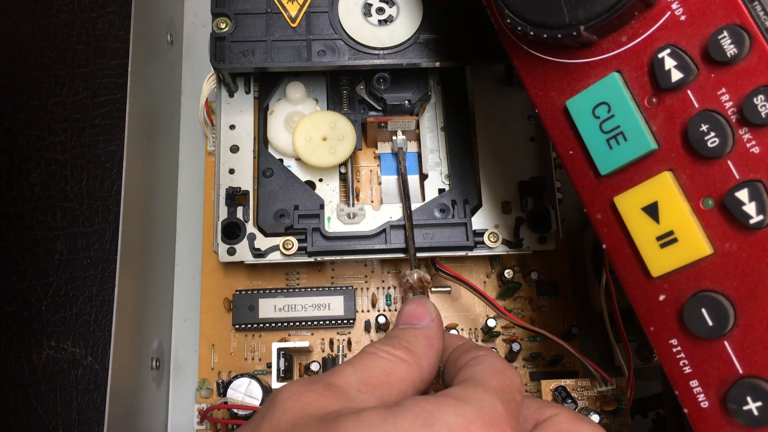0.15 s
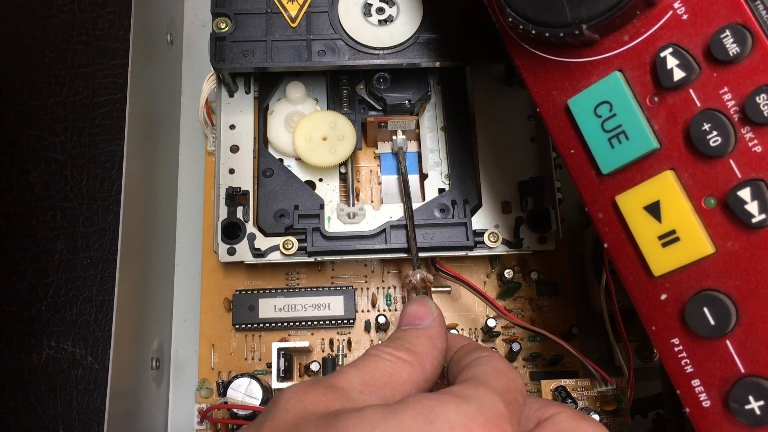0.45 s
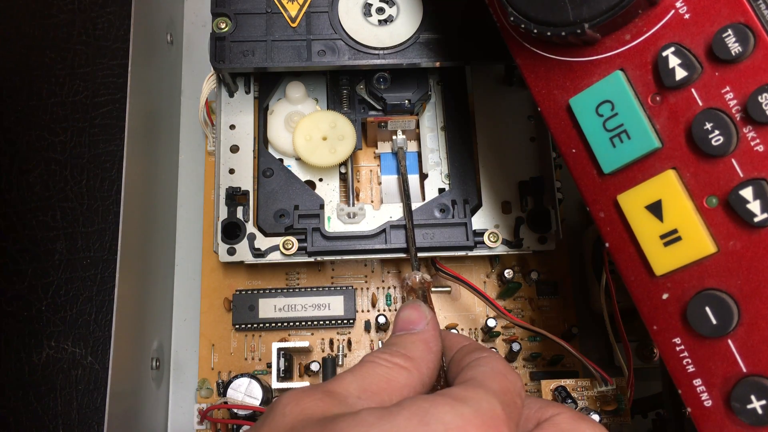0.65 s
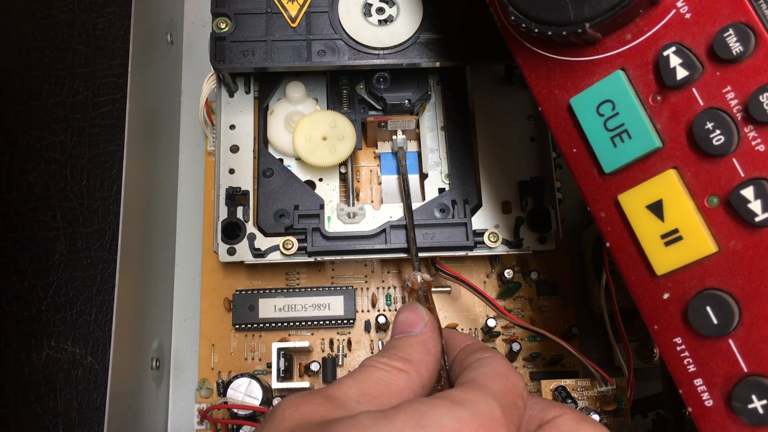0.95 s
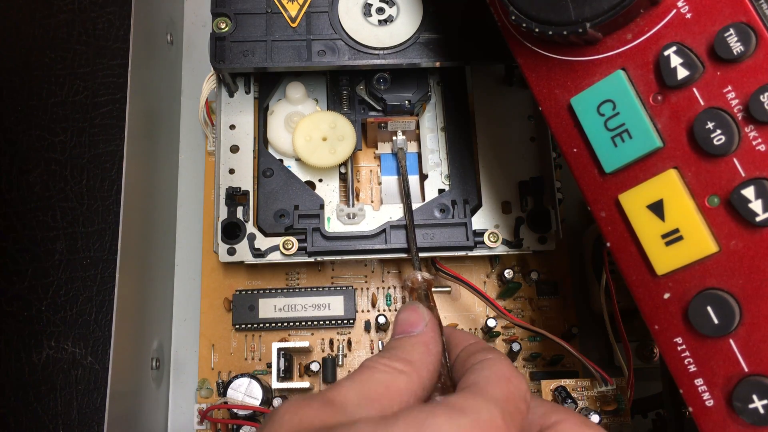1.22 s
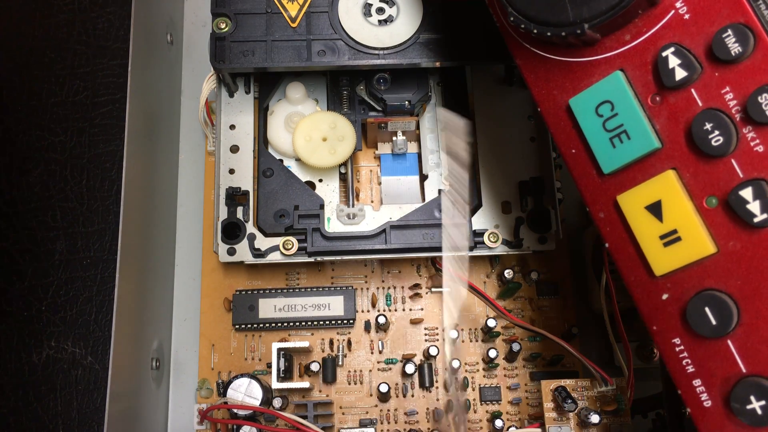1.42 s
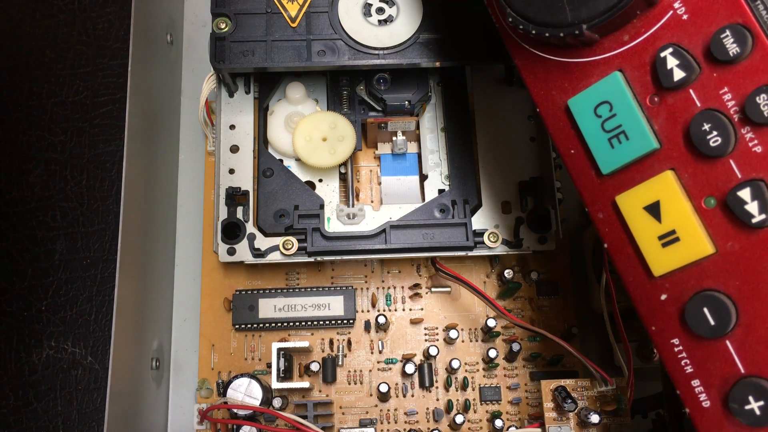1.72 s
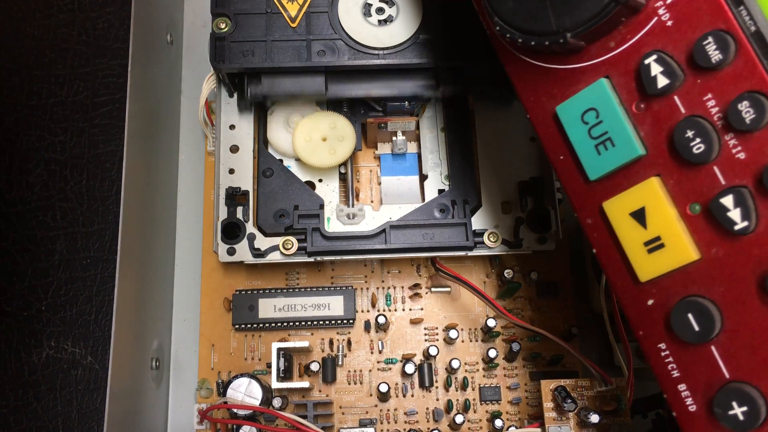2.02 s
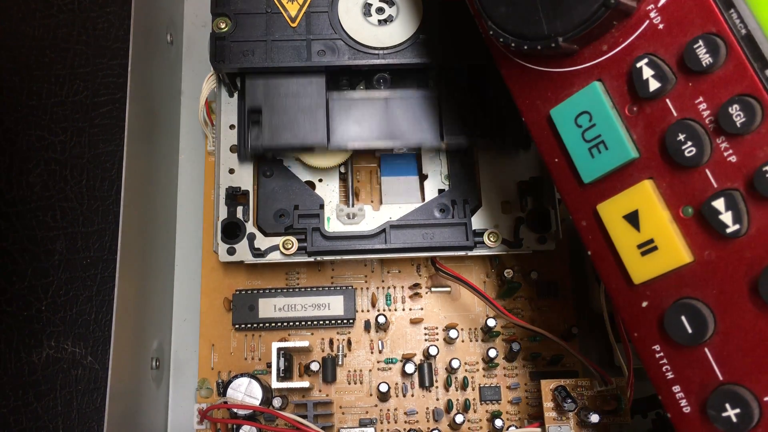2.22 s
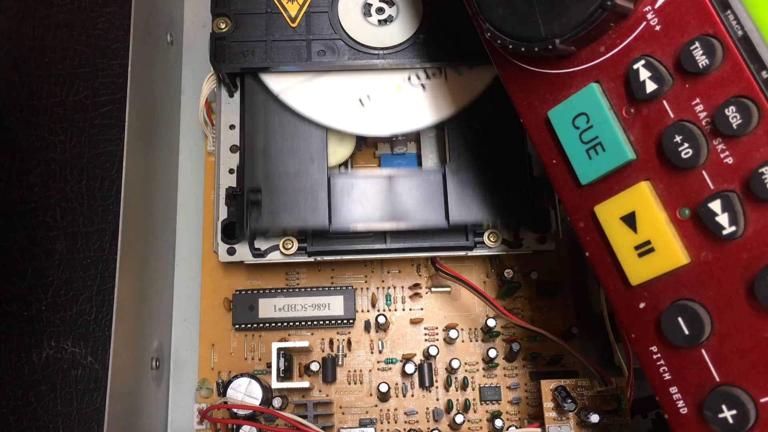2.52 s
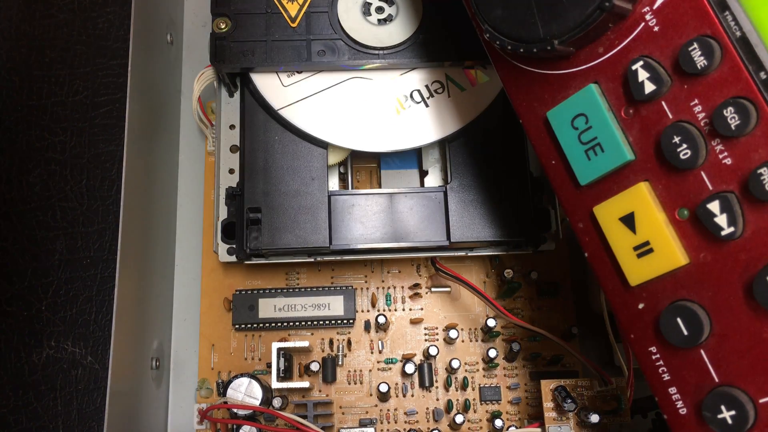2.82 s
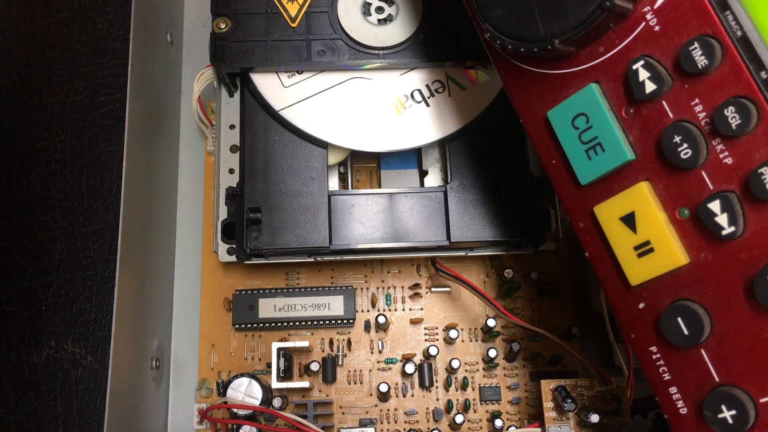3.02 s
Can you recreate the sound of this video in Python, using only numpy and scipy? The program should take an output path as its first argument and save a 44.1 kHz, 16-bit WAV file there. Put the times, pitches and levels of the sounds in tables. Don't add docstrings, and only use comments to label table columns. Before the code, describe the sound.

Disc player tray whirs and clatters along its rails after a button click, ending in a hard snap.

```python
import sys
import numpy as np
from scipy import signal
from scipy.fft import rfft, irfft, next_fast_len
from scipy.io import wavfile
from scipy.ndimage import uniform_filter1d

SR = 44100
rng = np.random.default_rng(int(sys.argv[2]) if len(sys.argv) > 2 else 0)


def store_wav(level_fs):
    pcm = np.round(np.clip(np.atleast_2d(level_fs), -1, 1) * 32767)
    wavfile.write(sys.argv[1], SR, pcm.T.astype(np.int16))


def amplitude_ratio(level_db):
    exponent = np.asarray(level_db, float) / 20
    return 10 ** exponent


N = 138915


def drift(rate_hz):
    r = np.exp(-2 * np.pi * rate_hz * 40 / SR)
    slow = signal.lfilter([1], [1, -2 * r, r * r], rng.standard_normal(N // 40 + 2002))[2000:]
    return np.interp(np.arange(N) / 40, np.arange(len(slow)), slow / slow.std())


def add(out, start_s, x):
    i = int(start_s * SR)
    out[i:i + len(x)] += x[:N - i]


# time in seconds, friction level in dB.
SLIDE = [(1.4, -107), (1.442, -59.5), (1.56, -60), (1.7, -63.5), (1.9, -60.5), (2.05, -60.5), (2.2, -63.5),
         (2.42, -62), (2.5, -57), (2.6, -64), (2.76, -61), (2.86, -57.5), (2.96, -79.5)]
# frequency in Hz, width in Hz, level in dB.
RAILS = [(160.5, 34, 0.5), (289, 41.5, 2), (413, 120, -9.5), (1000, 270, -11.5), (1350, 304, -9.5),
         (2400, 540, -21), (3180, 210, -17), (3870, 420, -20), (5840, 1900, -29.5), (8550, 330, -24),
         (9350, 260, -27.5), (10000, 230, -31), (12700, 290, -37.5)]
# time in seconds, frequency in Hz.
WHINE = [(1.45, 11200), (1.899, 11300), (2.3, 11850), (2.45, 12500), (2.8, 12700)]
GRAINS_PER_S, GRAIN_SPREAD_DB, RAIL_HISS_DB, SLIDE_TRIM_DB = 2500, 2, -37.5, 4.5
MOTOR_PER_S, MOTOR_DEPTH = 180, 0.6
WHINE_WIDTH_HZ, WHINE_DB = 170, -28


def slide():
    t = np.arange(N) / SR
    slips = rng.random(N) < GRAINS_PER_S / SR
    strength = amplitude_ratio(GRAIN_SPREAD_DB * np.minimum(rng.exponential(1, N), 5))
    grains = slips * strength * rng.choice([-1, 1], N)
    brushes = 1 + MOTOR_DEPTH * np.cos(2 * np.pi * MOTOR_PER_S * t + drift(3.3))

    friction = amplitude_ratio(RAIL_HISS_DB) * grains
    for k, (hz, width_hz, db) in enumerate(RAILS):
        r = np.exp(-np.pi * width_hz / SR)
        poles = [1, -2 * r * np.cos(2 * np.pi * hz / SR), r * r]
        band = signal.lfilter([(1 - r * r) / 2, 0, (r * r - 1) / 2], poles, grains)
        beat = brushes if hz > 8000 else 1
        friction = friction + (-1) ** k * amplitude_ratio(db + 1.76 * drift(15)) * band * beat

    whine_turns = np.cumsum(np.interp(t, *np.transpose(WHINE))) / SR
    narrow = signal.sosfilt(signal.butter(2, WHINE_WIDTH_HZ, fs=SR, output="sos"), grains)
    whine = amplitude_ratio(WHINE_DB) * narrow * brushes * np.cos(2 * np.pi * whine_turns)

    out = friction + whine
    time_s, db = np.transpose(SLIDE)
    level = amplitude_ratio(SLIDE_TRIM_DB + np.interp(t, time_s, db, left=-120, right=-120))
    return level * out / out.std()


def ring(force, hz, t60_s):
    r, w = amplitude_ratio(-60 / (t60_s * SR)), 2 * np.pi * hz / SR
    return signal.lfilter([0, np.sin(w)], [1, -2 * r * np.cos(w), r * r], force + 1e-18)


def coloured(x, bright_oct, spread_oct):
    hz = np.arange(len(x) // 2 + 1) * SR / len(x) + 1
    off = (np.log2(hz / 1000) - bright_oct) / spread_oct
    return irfft(rfft(x) * amplitude_ratio(-6 * off ** 2), len(x))


SPREAD_OCT, CHATTER = 1.156, 0.5


def contacts(rows, modes, scatter_db, detune, crack_db, strike, sign=-1):
    out, t = np.zeros(N), np.arange(SR // 8) / SR
    for start_s, peak_db, bright_oct, chatter_s in rows:
        rough = rng.standard_normal(len(t)) * rng.exponential(1, len(t)) ** 0.4
        force = CHATTER * rough * np.exp(-t / max(chatter_s, 1e-4))
        force[0] += strike
        luck_db = rng.normal(0, scatter_db, len(modes))
        shift = 1 + detune * rng.standard_normal(len(modes))
        x = np.zeros(len(t))
        for k, (hz, db, t60_s) in enumerate(modes):
            off = (np.log2(hz / 1000) - bright_oct) / SPREAD_OCT
            mode_db = db + luck_db[k] - 5.24 * off ** 2
            x += sign ** k * amplitude_ratio(mode_db) * ring(force, hz * shift[k], t60_s)
        crack = 8 * coloured(force, bright_oct, 1.48 * SPREAD_OCT) * (t < 0.1)
        x = x + amplitude_ratio(crack_db) * crack
        add(out, start_s, amplitude_ratio(peak_db) * x / np.abs(x).max())
    return out


# start in seconds, peak in dB, brightness in octaves above 1 kHz, chatter in seconds.
TOUCHES = [
    (.915, -59, 1.7, 0.0011),
    (.927, -64, .1, 0.0025),
    (1.279, -48.5, 1.03, 0.0042),
    (1.2875, -40, 1.8, 0.00075),
]
RATTLES = [(1.434, -55, 1.5, 0.0028), (1.442, -44, 0.92, 0.006), (1.451, -38, 0.85, 0.0028),
           (1.466, -48, 1.3, 0.0026), (1.523, -41, 1.8, 0.011), (1.5435, -37, 0.68, 0.0029),
           (1.573, -48, 1.8, 0.0033), (1.619, -44, 1.1, 0.0096), (1.7195, -40, 1.6, 0.0057),
           (1.742, -34, 1.86, 0.0057), (1.755, -45.5, 1.8, 0.0079), (1.7815, -39.5, 1.63, 0.0048),
           (1.807, -52, 1.3, 0.0059), (1.826, -46, 1.6, 0.0081), (1.873, -44, 1.35, 0.0028),
           (1.884, -41, 1.9, 0.0043), (1.967, -51, 2.2, .002), (1.982, -47, 1.2, 0.0011),
           (2.046, -48, 1.55, 0.004), (2.056, -45, 2.3, 0.0037), (2.065, -50, 1.5, .003),
           (2.078, -44, 2.16, .004), (2.203, -48, 2.4, 0.0021), (2.29, -46, 1.17, 0.011),
           (2.323, -52.5, 2.1, 0.0034)]
KNOCKS = [(2.418, -49, 1, 0.003), (2.431, -51, 4, 0.0013), (2.444, -40, -0.2, 0.002),
          (2.449, -36.5, 0.2, 0.0046), (2.459, -44.5, 1, 0.0073), (2.468, -44.5, 0.7, 0.0025),
          (2.488, -55, -0.5, 0.0032), (2.491, -37.5, 0.1, 0.0021), (2.5, -41, 2.1, 0.0021),
          (2.514, -43, 1, 0.0035), (2.524, -57, 9, .004), (2.638, -43.5, 0.2, 0.007),
          (2.645, -41.5, -0.05, 0.004), (2.659, -35, 0.4, 0.004), (2.664, -38.5, 0.54, 0.0033),
          (2.67, -40, -0.03, .004), (2.679, -52, 3.4, .005), (2.689, -51.5, 0.7, 0.0065),
          (2.774, -39.5, 1, 0.0064), (2.787, -27, 0.36, 0.003), (2.793, -37.5, 0.3, 0.0033),
          (2.798, -35, 2.1, 0.0025), (2.854, -40, -0.4, 0.0037), (2.89, -35.5, 0.44, 0.0067),
          (2.899, -40.5, 0, 0.0075), (2.908, -45, -0.5, 0.0075), (2.921, -49, -0.1, 0.0092)]
# frequency in Hz, level in dB, T60 in seconds.
TRAY = [(547, 4, 0.023), (830, -4, 0.033), (1098, 2.5, 0.036), (1338, 3.5, .025), (1640, 0.5, 0.019),
        (2090, -1, 0.014), (3140, -1.5, 0.02), (3600, 2, 0.012), (4480, 2.5, 0.0057), (5630, 2.5, 0.008),
        (6700, -8, 0.0047), (8800, -14.5, .006), (11000, -8.5, 0.0033), (12000, -12, .004)]


def tray():
    rows = TOUCHES + RATTLES + KNOCKS
    return contacts(rows, sorted(TRAY * 3), scatter_db=1.5, detune=0.07, crack_db=5, strike=1.64)


# start in seconds, peak in dB, brightness in octaves above 1 kHz, chatter in seconds.
LATCH = [
    (2.8113, -26.5, 2.4, 0.0023),
    (2.8225, -2.5, 1.5, 0.000079),
    (2.8135, -20, 0.83, 0.0072),
    (2.818, -26, 0.8, .003),
    (2.825, -12, 0.36, 0.0026),
    (2.832, -28, .5, 0.004),
]
# frequency in Hz, level in dB, T60 in seconds.
HOOK = [(555, -6.5, 0.04), (680, -8.5, .045), (1150, -12.5, 0.035), (1361, -10, 0.03), (2110, -13, 0.009),
        (2273, -0.5, 0.013), (2820, -5, 0.0063), (3310, -0.5, 0.01), (3520, -2.5, 0.0076),
        (3920, 0, 0.0126), (4850, -21.5, 0.011), (5340, -6.5, 0.008), (8570, -2.5, .012),
        (10700, -12.5, 0.011)]
LATCH_THIN_HZ, LATCH_SOFT_HZ = 900, 9000


def latch():
    x = contacts(LATCH, HOOK, 0.98, 0, crack_db=-27, strike=3.04, sign=0.95)
    return signal.sosfilt(signal.butter(1, [LATCH_THIN_HZ, LATCH_SOFT_HZ], "band", fs=SR, output="sos"), x)


# frequency in Hz, level in dB, T60 in seconds.
FRAME = [(447, -68, 1.0), (754, -66, 1.6), (2094, -70, 1.6), (2223, -63, 1.2)]
TOCK_S, TOCK_DB, TOCK_HZ, TOCK_T60_S = 3.0002, -37, 1380, 0.021


def frame():
    out, click, t = np.zeros(N), np.eye(1, SR // 2)[0], np.arange(SR // 8) / SR
    snap_s = LATCH[1][0]
    add(out, snap_s, sum(amplitude_ratio(db) * ring(click, hz, t60_s) for hz, db, t60_s in FRAME))
    fade = amplitude_ratio(TOCK_DB - 60 * t / TOCK_T60_S) * np.minimum(t * TOCK_HZ / 2, 1)
    add(out, TOCK_S, fade * np.sin(2 * np.pi * TOCK_HZ * t))
    return out


# start in seconds, peak in dB, brightness in octaves above 1 kHz, chatter in seconds.
BUTTON = [
    (1.401, -29, 1.22, 0.00037),
]
# frequency in Hz, level in dB, T60 in seconds.
KEY = [(787, 3.5, 0.036), (1610, 7, 0.012), (2235, 2.5, 0.017), (4320, 10.5, 0.0058), (5440, 1, 0.0043),
       (8940, 2.5, 0.0077), (12300, 12, 0.0046), (14600, 19, 0.0035)]


def button():
    return contacts(BUTTON, KEY, 0, 0, crack_db=-14, strike=2.7)


# start in seconds, peak in dB, brightness in octaves above 1 kHz, chatter in seconds.
TAP = [
    (.5355, -46, 0.66, 0.0022),
]
# frequency in Hz, level in dB, T60 in seconds.
CARRIAGE = [(849, 3.5, 0.055), (950, 7.5, 0.062), (1070, 3, 0.036), (1230, 5.5, 0.045), (1550, -1, .02),
            (2060, 3.5, 0.019), (3170, 1, .012), (4000, 8, 0.013), (4540, 9, 0.012), (5450, 8, .008),
            (6850, 10, .012)]


def tap():
    return contacts(TAP, CARRIAGE, 0, 0, crack_db=-9, strike=1.1)


# start in seconds, level in dB, softness in Hz,
# weight of the deep modes in dB per octave.
PUSHES = [(1.285, -55, 500, -11.5), (1.3, -49.5, 504, -8), (1.401, -41.5, 1000, -22),
          (1.418, -44.5, 800, -23), (1.5459, -41.5, 900, -8.5), (1.79, -49.5, 400, -1),
          (1.875, -35, 197, 2.5), (1.981, -43.5, 900, 1), (2.447, -48, 500, -6), (2.469, -45.5, 403, -8.5),
          (2.53, -49.5, 398, -5), (2.661, -44, 600, -8), (2.785, -46, 600, -6.5), (2.821, -39, 251, -8),
          (2.902, -50, 300, -2.5)]
# frequency in Hz, level in dB, T60 in seconds.
CASE = [(52, -12, 0.74), (72.5, 0.5, 0.23), (165, 1, 0.21), (254, 5, 0.059), (287, -5, 0.15),
        (358.3, 0, 0.092), (491.4, -4, 0.12), (603, -10.5, 0.2)]
DEEP_BELOW_HZ = 376


def case():
    out, t = np.zeros(N), np.arange(SR // 2) / SR
    for start_s, push_db, soft_hz, deep_db in PUSHES:
        force = t * np.exp(-2 * np.pi * soft_hz * t)
        x = np.zeros(len(t))
        for k, (hz, db, t60_s) in enumerate(CASE):
            depth_oct = max(np.log2(DEEP_BELOW_HZ / hz), 0)
            mode_db = db + rng.normal(0, 1) + deep_db * depth_oct
            x += (-1) ** k * amplitude_ratio(mode_db) * ring(force, hz, t60_s)
        add(out, start_s, -amplitude_ratio(push_db) * x / np.abs(x).max())
    return signal.sosfilt(signal.butter(2, 40, "high", fs=SR, output="sos"), out)


# start in seconds, length in seconds, level in dB,
# brightness in octaves above 1 kHz.
RASPS = [
    (1.27, 0.046, -62, 2.2),
    (1.294, 0.037, -58.5, 1.55),
    (1.477, 0.036, -55.5, 0.96),
    (2.043, 0.06, -66.5, 1.7),
    (2.446, 0.066, -56.5, 0.67),
    (2.824, 0.064, -46, 0.23),
]
RASP_SPREAD_OCT, RASP_GRAIN_DB = 1.29, 0


def rasps():
    out, t = np.zeros(N), np.arange(SR // 8) / SR
    for start_s, length_s, db, bright_oct in RASPS:
        clumps = 5 * uniform_filter1d(rng.standard_normal(len(t)), size=60)
        grains = rng.standard_normal(len(t)) * amplitude_ratio(RASP_GRAIN_DB * clumps)
        x = coloured(grains, bright_oct, RASP_SPREAD_OCT)
        swell = np.sin(np.pi * np.clip(t / length_s, 0, 1) ** 0.48)
        add(out, start_s, amplitude_ratio(db) * x / x.std() * swell)
    return out


ROOM_T60_S, ROOM_DB, WALL_CUT_HZ = 0.27, -17.5, 1400


def room(x):
    size = next_fast_len(N + SR)
    hz = np.arange(size // 2 + 1) * SR / size
    t60_s = ROOM_T60_S / (1 + hz / WALL_CUT_HZ)
    echo = 0
    for k, lag_s in enumerate(rng.uniform(0.007, 0.03, 10)):
        loop = amplitude_ratio(-60 * lag_s / t60_s) * np.exp(-2j * np.pi * hz * lag_s)
        echo = echo + (-1) ** k * loop / (1 - loop)
    return amplitude_ratio(ROOM_DB) * irfft(rfft(x, size) * echo, size)[:N]


# frequency in Hz, level in dB per Hz.
FLOOR = [(20, -6.5), (60, -3.5), (200, -1), (350, -6.5), (600, -11.5), (1300, -11), (4000, -23),
         (13000, -28.5), (15500, -31.5)]
FLOOR_DB, FLOOR_PATCHY_DB, FLOOR_TOP_HZ = -69, 1.55, 14800


def floor():
    out, edges_hz, white = 0, 22 * 2 ** np.arange(0, 9.6, 0.5), rng.standard_normal((2, N + SR))
    hz, db = np.transpose(FLOOR)
    for k, (low, high) in enumerate(zip(edges_hz, edges_hz[1:])):
        band = signal.sosfilt(signal.butter(2, [low, high], "band", fs=SR, output="sos"), white[k % 2])[SR:]
        band_db = np.interp(np.log(low * high) / 2, np.log(hz), db)
        out = out + amplitude_ratio(band_db + FLOOR_PATCHY_DB * drift(4.1)) * band
    out = signal.sosfilt(signal.cheby2(8, 25, FLOOR_TOP_HZ, fs=SR, output="sos"), out)
    return amplitude_ratio(FLOOR_DB) * out / out.std()


def scene():
    hits = tray() - latch() + button() + tap() + rasps()
    return (slide() + hits + room(hits) + case() + frame() + floor())[None]


def band_limit(x):
    return signal.sosfilt(signal.butter(12, 16500, fs=SR, output="sos"), x)


def record(dry):
    mix = signal.sosfilt(signal.cheby2(10, 50, 16300, fs=SR, output="sos"), dry)
    return band_limit(mix)


dry = scene()
out = record(dry)
store_wav(out)
```